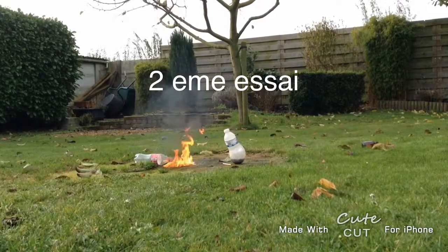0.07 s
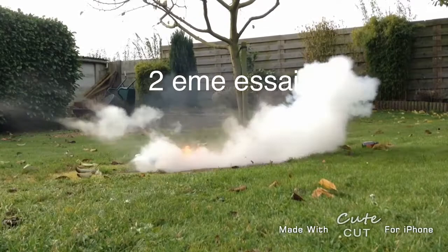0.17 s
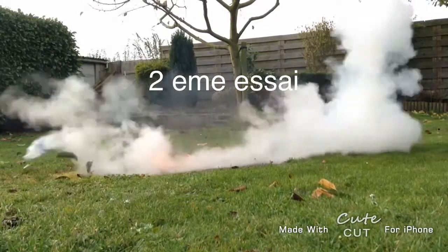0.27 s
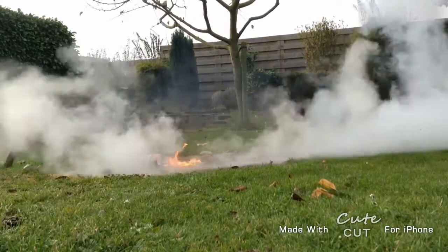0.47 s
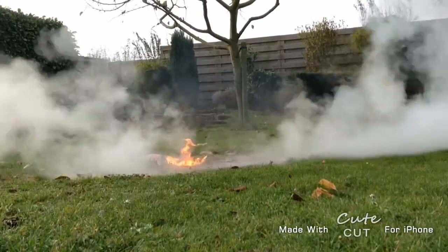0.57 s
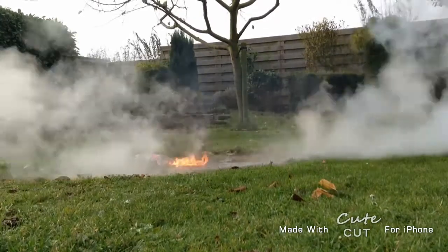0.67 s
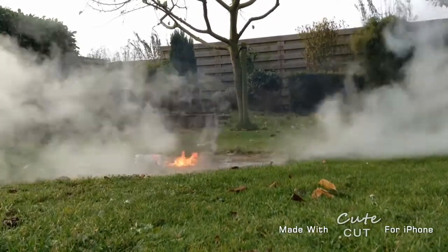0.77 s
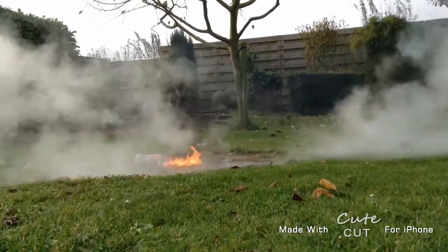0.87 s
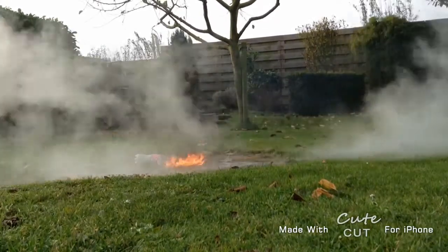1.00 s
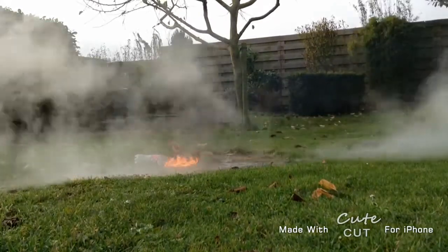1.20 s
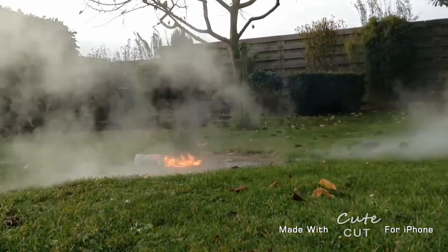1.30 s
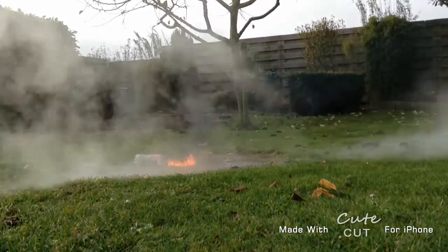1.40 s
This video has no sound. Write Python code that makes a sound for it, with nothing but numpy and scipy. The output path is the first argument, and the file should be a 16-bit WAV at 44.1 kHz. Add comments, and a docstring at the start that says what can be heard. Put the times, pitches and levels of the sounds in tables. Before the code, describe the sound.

A plastic bottle bursts with one very loud, sharp bang at about 0.2 seconds, after a moment of faint fire crackle in a garden. The bang overloads the microphone. Dull, hollow echoes and a boom follow immediately, mostly gone by 0.7 seconds. A low rumble then fades through the end at around 1.5 seconds, with a few faint crackles in it.

```python
"""A plastic bottle bursts beside a small fire on a fenced lawn.
Its shock, an N-wave followed by a rush of gas, scatters off fence and hedges, reflects from houses
as dull slaps, reverberates through the gardens and rolls away as a low rumble. The fire crackles
softly before and after. The bang overloads the microphone and pulls down the recorder's gain,
which then recovers slowly."""
import sys
import numpy as np
from scipy import signal
from scipy.io import wavfile
from scipy.ndimage import uniform_filter1d, minimum_filter1d

SR = 44100
rng = np.random.default_rng(int(sys.argv[2]) if len(sys.argv) > 2 else 0)


def dump(signal):
    """Clip the signal to [-1, 1] and save it as 16-bit WAV at the path in sys.argv[1]."""
    limited = np.clip(np.atleast_2d(signal).T, -1, 1)
    pcm = np.round(limited * 32767).astype(np.int16)
    wavfile.write(sys.argv[1], SR, pcm)


N = 63945
T = np.arange(N) / SR

# flames and outdoor air: (frequency [Hz], third-octave level [dB])
AIR_BANDS = [(40, -64), (100, -61), (170, -57), (280, -55), (420, -62), (1200, -61.5), (3500, -65.5),
             (6000, -73), (10000, -70.5), (15000, -73)]
# dull pops in the fire: (time [s], level [dB], treble edge [Hz])
FIRE_POPS = [(0.0251, -26.5, 1300)]
# crackles of fire and falling shreds: (time [s], level [dB], centre [Hz], t60 [s])
CRACKLES = [(0.141, -51.5, 4200, 0.054), (0.1598, -44, 2680, 0.099), (0.185, -48, 3050, 0.091),
            (.749, -53, 8300, 0.13), (.764, -34, 1190, .08), (.773, -53.5, 8400, .05),
            (1.008, -48, 3100, 0.42), (1.387, -54.5, 7000, .04), (1.400, -52.5, 4500, 0.054)]
# escaping gas and shreds: (frequency [Hz], third-octave level [dB], t60 [s])
SPRAY_BANDS = [(230, -12, 0.031), (340, 3, 0.026), (700, 0.5, .06), (1500, -3, 0.055), (4000, -2.5, 0.058),
               (8800, -8.5, .07), (15000, -6, .065)]
# bright scatter from fence, hedges and tree: (frequency [Hz], third-octave level [dB], t60 [s])
FENCE_BANDS = [(150, -17.5, 0.25), (300, -10, .22), (620, -4, 0.16), (1190, -13, 0.37), (3000, -9, .24),
               (6000, -12.5, 0.19), (10000, -14, 0.19), (14900, -15.5, 0.19)]
# reverberation of the gardens: (frequency [Hz], third-octave level [dB], t60 [s])
GARDEN_BANDS = [(100, -28, 0.81), (170, -8.5, .8), (240, -6.5, 0.97), (480, -6, 0.82), (757, -9.5, .92),
                (1150, -20, .78), (2230, -18, 0.83), (4200, -15, 0.76), (6960, -17.5, .53),
                (10000, -19.5, .44), (14500, -30, .36)]
# boom reflected by the nearest walls: (frequency [Hz], third-octave level [dB], t60 [s])
WALL_BANDS = [(130, -19, 0.09), (180.5, -1, .2), (300, -1, 0.2), (480, 3.5, 0.077), (773, -2, 0.16),
              (1210, -22, .12), (3967, -40.5, .1)]
# distant rumble: (frequency [Hz], third-octave level [dB], t60 [s])
RUMBLE_BANDS = [(111.7, -53, 0.88), (202, -44.5, 2.9), (387, -39.5, 2.08), (690, -38.5, 1.77),
                (1160, -47, 1.83), (3000, -48.5, 1.6), (6100, -68, 1.1)]
# reflections of the shock from houses: (time [s], level [dB], treble edge [Hz])
HOUSE_ECHOES = [(.2295, 21, 1530), (.3098, 6, 1400), (.3422, 1, 790), (0.361, 3, 703), (0.3759, 9, 650),
                (0.3798, 8, 810), (0.412, 5, 925), (.4270, 14.5, 625), (0.4295, 12.5, 560),
                (0.4337, 9.5, 416), (0.4409, 7, 1060), (.4585, 8, 445), (0.4944, 10.5, 769),
                (.5968, -1.5, 800), (.6170, 0, 920), (.6605, -1.5, 846), (0.6681, -11, 800),
                (.7330, -11, 750), (0.857, -18, 595), (0.882, -14.5, 500), (.940, -20.5, 655),
                (1.228, -25, 648)]
# reflections from single fence panels: (time [s], level [dB])
PANEL_ECHOES = [(.2310, -1), (.2345, -3.5), (.2382, -3), (.2485, 0), (.2515, 0.5), (.2562, -1), (.2652, -3),
                (0.2693, -5), (.2805, -4.5), (0.284, -5.5), (.2925, -8), (.3020, -10)]
# low notes that hang in the boom: (frequency [Hz], level [dB], t60 [s])
BOOM_NOTES = [(219, -3, 0.87), (447, -5, 0.32), (498.4, -5, .65)]


def from_db(db):
    """Amplitude ratio of a level in decibels."""
    return 10 ** (np.asarray(db) / 20)


def filtered(x, hz, kind, order=2):
    """Causal Butterworth filter."""
    sections = signal.butter(order, np.clip(hz, 10, .45 * SR), kind, fs=SR, output="sos")
    return signal.sosfilt(sections, x + 1e-18)


def band_noise(hz, octaves):
    """Band-limited Gaussian noise of unit rms."""
    edge = 2 ** (octaves / 2)
    noise = filtered(rng.standard_normal(2 * N), [hz / edge, hz * edge], "band")[N:]
    return noise / noise.std()


def bands(table):
    """Third-octave noises over a table's range, each with the table's values at its centre."""
    hz, *columns = np.transpose(table)
    for centre in 40 * 2 ** (np.arange(27) / 3):
        noise = band_noise(centre, 1 / 3)
        if hz[0] / 1.2 < centre < hz[-1] * 1.2:
            yield noise, *(np.interp(np.log(centre), np.log(hz), column) for column in columns)


def envelope(start_s, rise_s, hold_s, t60):
    """Linear rise, hold, then exponential decay by 60 dB in t60 seconds."""
    decay_s = np.maximum(T - start_s - rise_s - hold_s, 0)
    return np.clip((T - start_s) / rise_s, 0, 1) * from_db(-60 * decay_s / t60)


def scatter(table, start_s, rise_s, clump_db, clump_hz, hold_s=0):
    """Superposition: countless small arrivals merge into clumped noise, each band with its own decay."""
    clumps = filtered(rng.standard_normal(N), clump_hz, "low")
    wash = sum(noise * from_db(db) * envelope(start_s, rise_s, hold_s, t60)
               for noise, db, t60 in bands(table))
    return wash * from_db(clump_db * clumps / clumps.std())


def n_wave(start_s, length_s):
    """N-wave: a jump in pressure, a linear fall to rarefaction and a jump back."""
    phase = (T - start_s) / length_s
    return (1 - 2 * phase) * ((phase >= 0) & (phase < 1))


def fire():
    """Combustion noise: a steady bed of flame and air, a dull pop, crackles of fire and falling shreds."""
    air = sum(noise * from_db(db) for noise, db in bands(AIR_BANDS))
    pops = sum(from_db(db) * filtered(n_wave(s, length_s=.00098), hz, "low") for s, db, hz in FIRE_POPS)
    crackles = sum(from_db(db) * band_noise(hz, octaves=.7) * envelope(s, rise_s=.0013, hold_s=0, t60=t60)
                   for s, db, hz, t60 in CRACKLES)
    return air + pops + crackles


def bottle_burst(start_s=.2129, shock_db=7.5):
    """Sudden release of pressure radiates a shock; the gas rushes out just behind it."""
    shock = from_db(shock_db) * n_wave(start_s, length_s=.00095)
    spray = scatter(SPRAY_BANDS, start_s + .0012, rise_s=.00055, clump_db=5.5, clump_hz=400)
    return shock + spray


def reverberation():
    """Diffuse reflection returns the bang from fence, walls and gardens, and last from far away."""
    fence = scatter(FENCE_BANDS, start_s=.2292, rise_s=.0015, hold_s=.032, clump_db=3, clump_hz=240)
    walls = scatter(WALL_BANDS, start_s=.238, rise_s=.01195, hold_s=.032, clump_db=1.6, clump_hz=108)
    gardens = scatter(GARDEN_BANDS, start_s=.23, rise_s=.049, clump_db=.5, clump_hz=90)
    rumble = scatter(RUMBLE_BANDS, start_s=.5, rise_s=.19, clump_db=1.5, clump_hz=25)
    return fence + walls + gardens + rumble


def house_echoes(ring_hz=433, ring_t60=.025, ring_db=-29.5):
    """Reflection from houses returns the shock as dull, hollow slaps, each with a damped resonance."""
    slaps = sum(from_db(db) * filtered(n_wave(s, length_s=.0014), hz, "low", order=4)
                for s, db, hz in HOUSE_ECHOES)
    radius = from_db(-60 / (ring_t60 * SR))  # poles of the resonator
    angle = 2 * np.pi * ring_hz / SR
    ring = signal.lfilter([0, angle * np.sin(angle)], [1, -2 * radius * np.cos(angle), radius ** 2], slaps)
    return -filtered(slaps + from_db(ring_db) * ring, hz=299.2, kind="high", order=1)


def panel_echoes():
    """Early reflections from single fence panels arrive as short bright cracks."""
    cracks = sum(from_db(db) * envelope(s, rise_s=.0006, hold_s=.0013, t60=.019) for s, db in PANEL_ECHOES)
    return band_noise(hz=4200, octaves=2.8) * cracks


def boom_notes():
    """Damped sinusoids: a few low notes swell along with the boom and outlast it."""
    return sum(from_db(db) * np.sin(2 * np.pi * (hz * T + rng.random()))
               * envelope(start_s=.238, rise_s=.01195, hold_s=0, t60=t60) for hz, db, t60 in BOOM_NOTES)


def scene():
    """Superposition: direct sound and reflections add at the microphone, in one channel."""
    return (bottle_burst() + panel_echoes() + house_echoes() + reverberation() + boom_notes() + fire())[None]


def gain_control(x, threshold_db=-26, most_db=10, attack_s=.0054, recovery_db_per_s=3.2):
    """Automatic gain control: loud sound pulls the gain down quickly; it recovers slowly."""
    excess_db = np.clip(20 * np.log10(np.abs(x) + 1e-9) - threshold_db, 0, most_db)
    recovery_db = recovery_db_per_s * T
    reduction_db = np.maximum.accumulate(excess_db + recovery_db, axis=-1) - recovery_db
    pole = np.exp(-1 / (attack_s * SR))
    return x * from_db(-signal.lfilter([1 - pole], [1, -pole], reduction_db))


def limiter(x, ceiling=1.36, window_s=.0014):
    """Peak limiting: the gain dips briefly around each peak above the ceiling."""
    width = int(window_s * SR)
    gain = ceiling / np.maximum(np.abs(x), ceiling)
    return x * uniform_filter1d(minimum_filter1d(gain, width), width)


def overload(x, ceiling=.99):
    """Saturation rounds off the remaining peaks."""
    return x / (1 + (x / ceiling) ** 8) ** (1 / 8)


def record(dry):
    """A small microphone and recorder have limited bandwidth and dynamic range."""
    x = filtered(dry, hz=135, kind="high", order=4)
    x = limiter(gain_control(x))
    x = overload(filtered(x, hz=120, kind="high"))
    treble_cut = signal.ellip(12, .1, 80, 15300, fs=SR, output="sos")  # steep edge at 15.3 kHz
    return signal.sosfilt(treble_cut, x)


dry = scene()
out = record(dry)
dump(out)
```